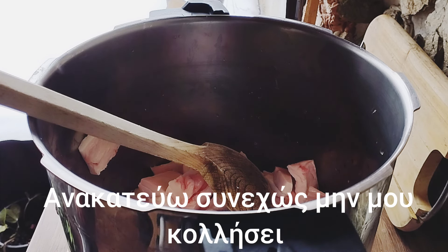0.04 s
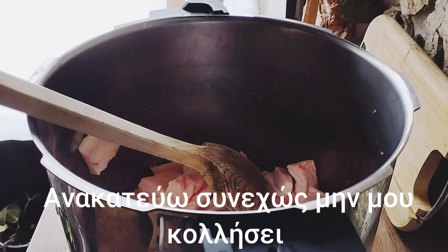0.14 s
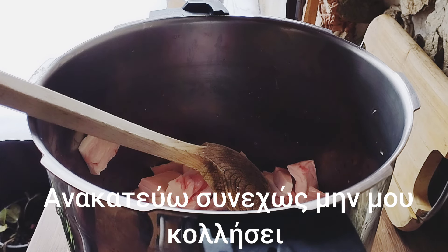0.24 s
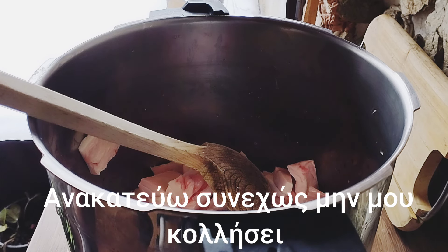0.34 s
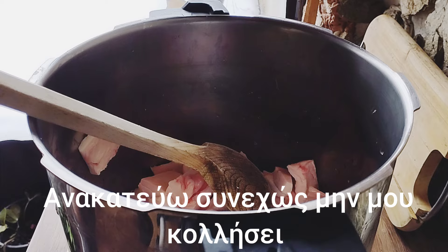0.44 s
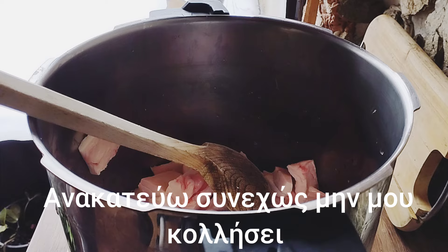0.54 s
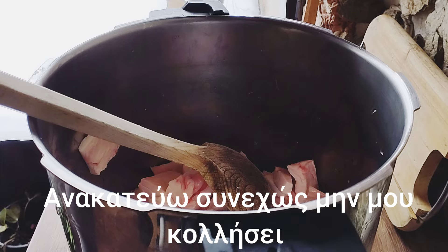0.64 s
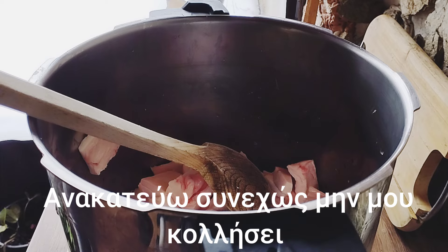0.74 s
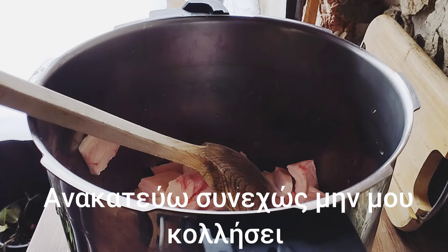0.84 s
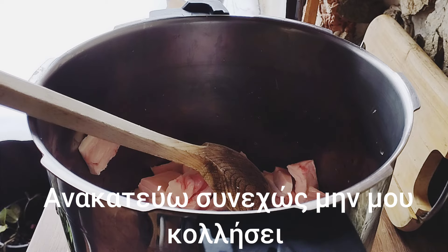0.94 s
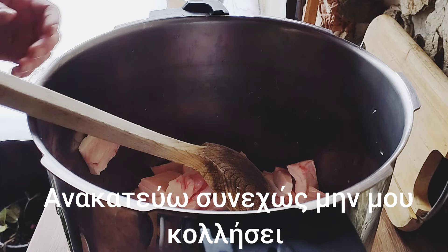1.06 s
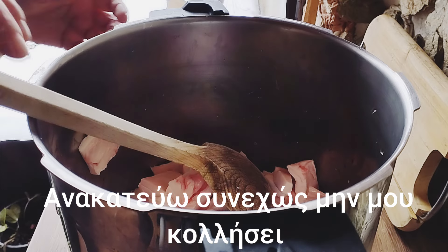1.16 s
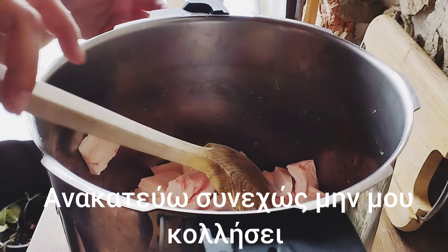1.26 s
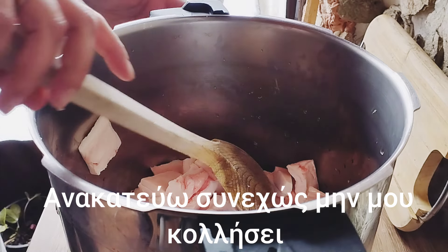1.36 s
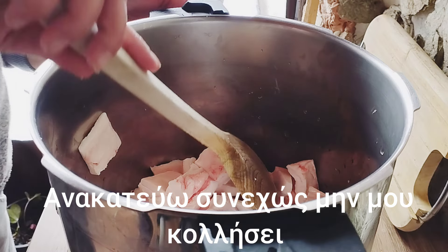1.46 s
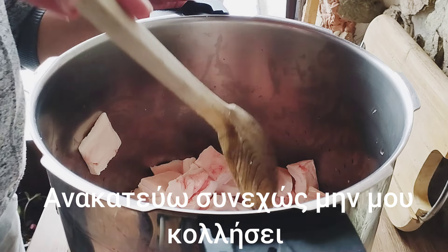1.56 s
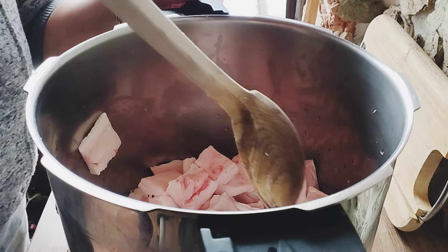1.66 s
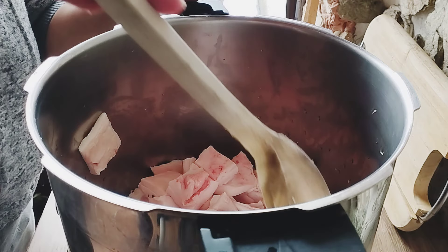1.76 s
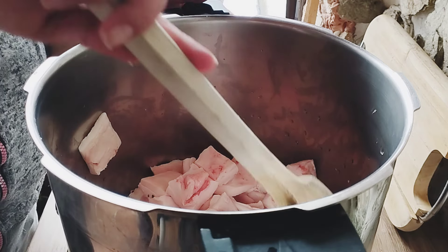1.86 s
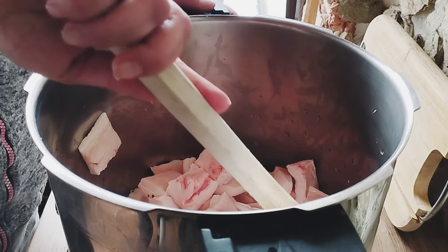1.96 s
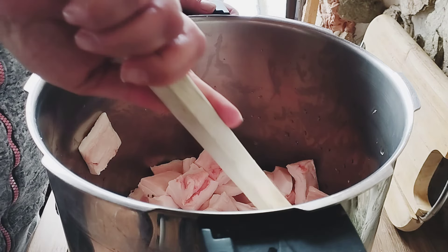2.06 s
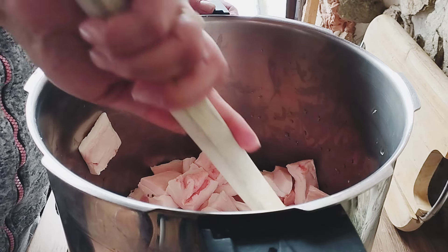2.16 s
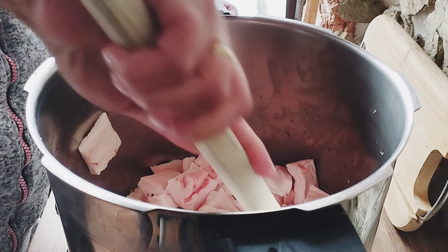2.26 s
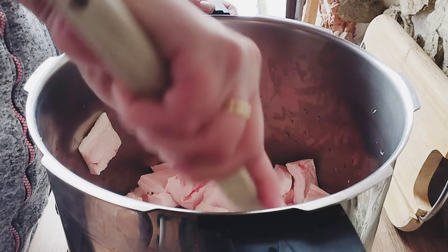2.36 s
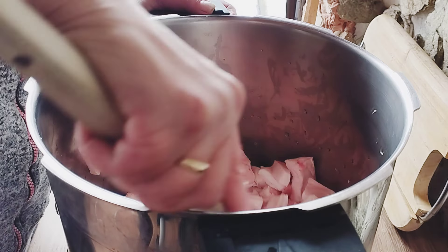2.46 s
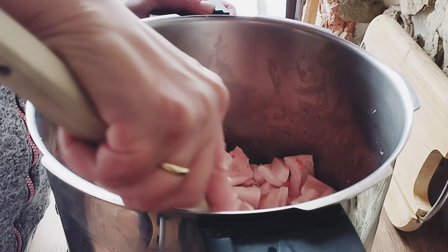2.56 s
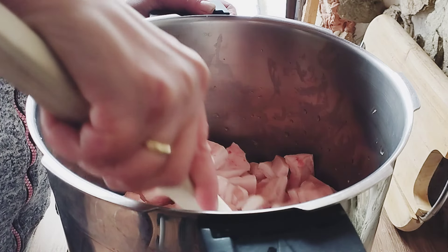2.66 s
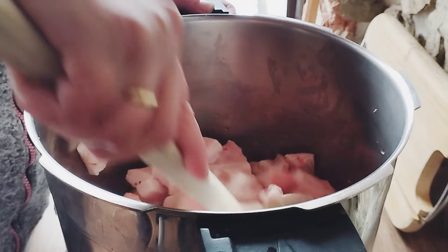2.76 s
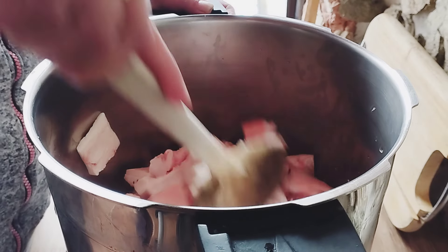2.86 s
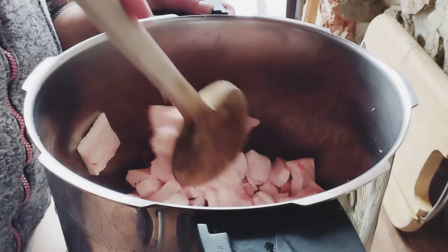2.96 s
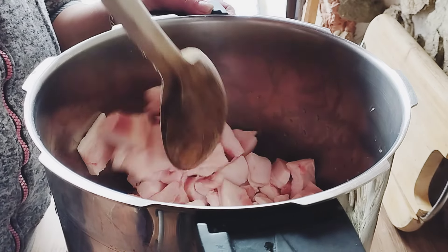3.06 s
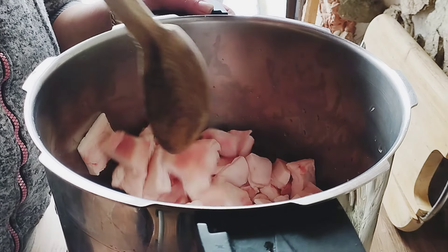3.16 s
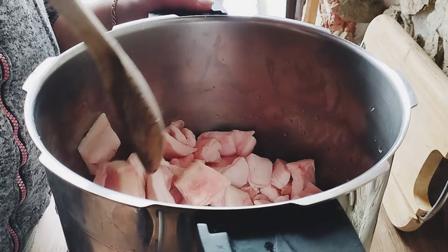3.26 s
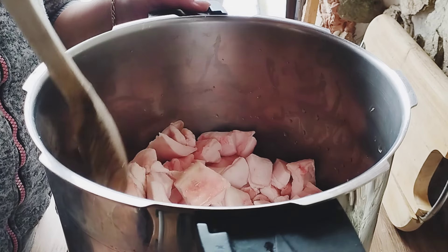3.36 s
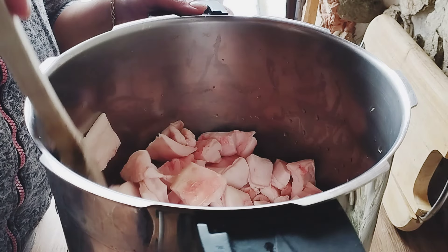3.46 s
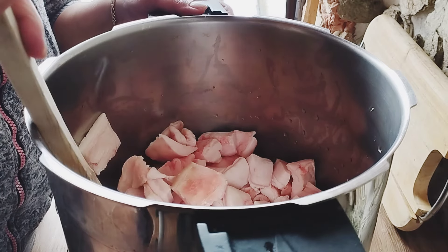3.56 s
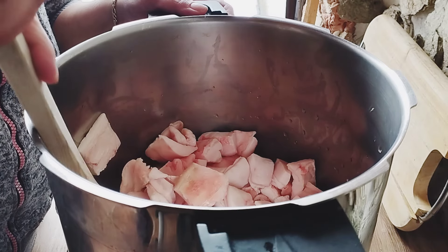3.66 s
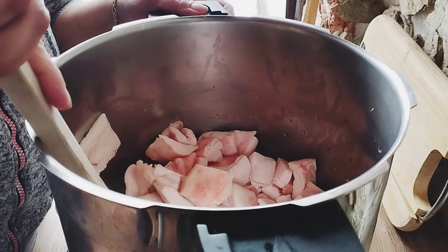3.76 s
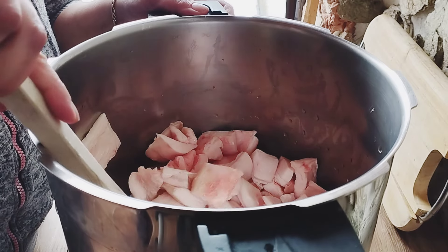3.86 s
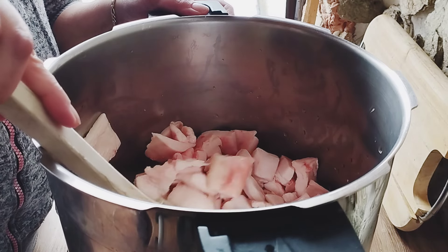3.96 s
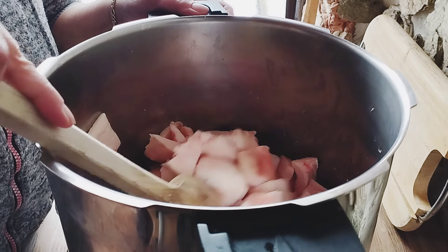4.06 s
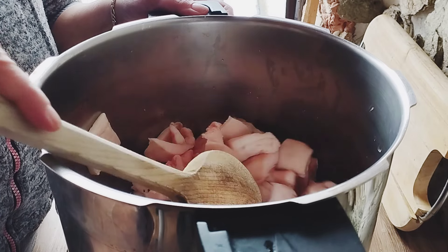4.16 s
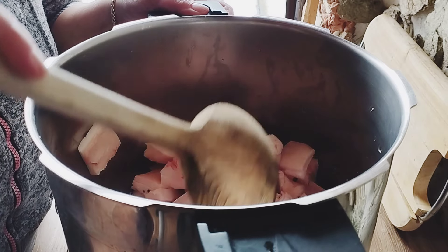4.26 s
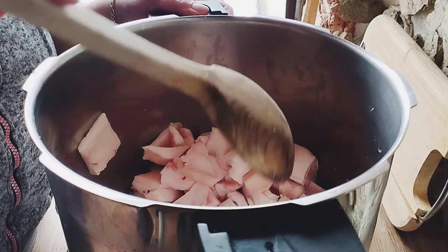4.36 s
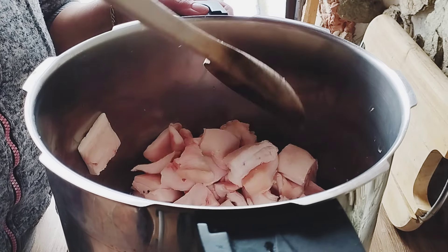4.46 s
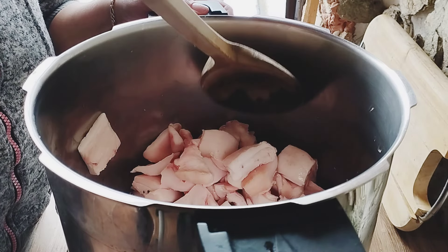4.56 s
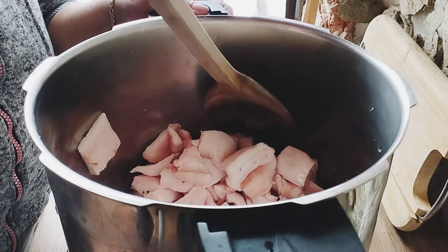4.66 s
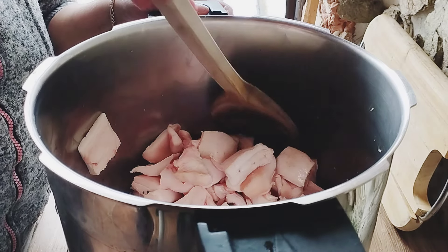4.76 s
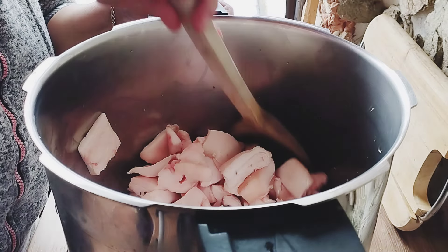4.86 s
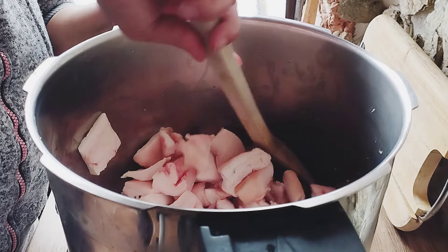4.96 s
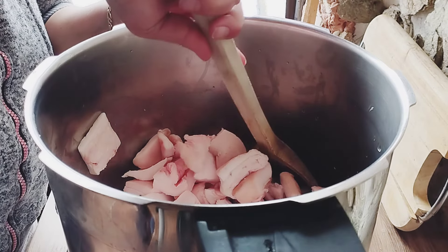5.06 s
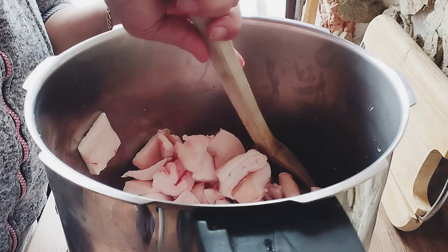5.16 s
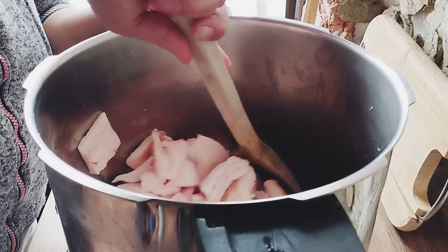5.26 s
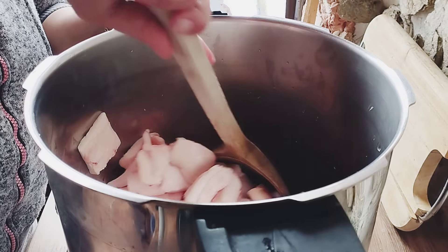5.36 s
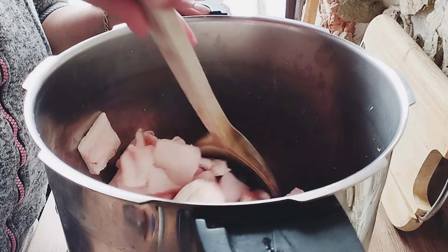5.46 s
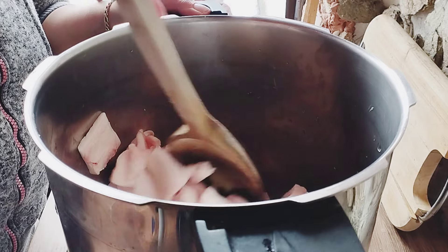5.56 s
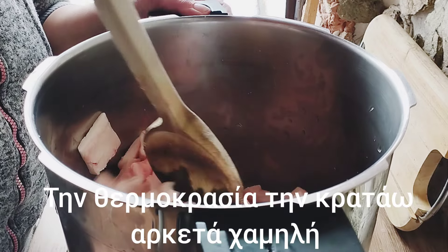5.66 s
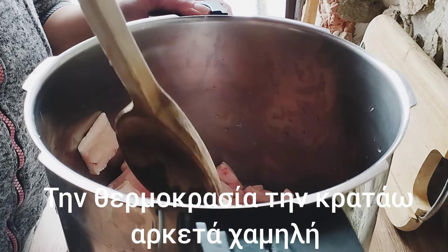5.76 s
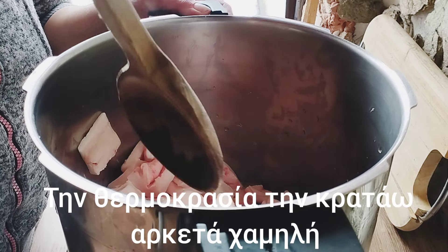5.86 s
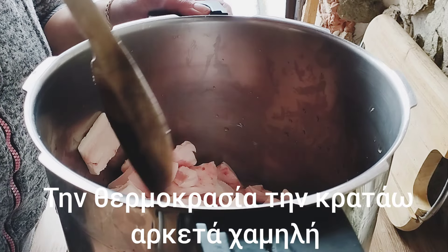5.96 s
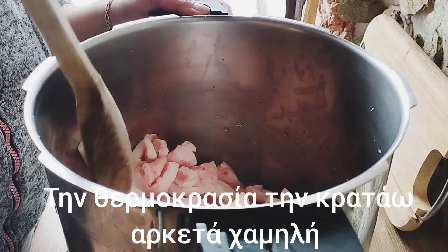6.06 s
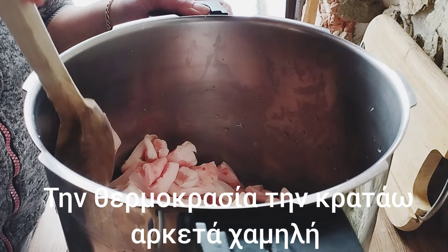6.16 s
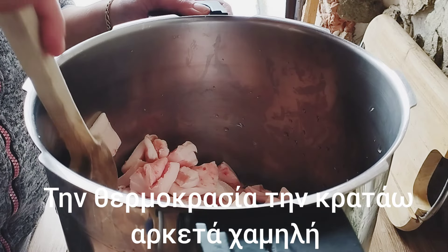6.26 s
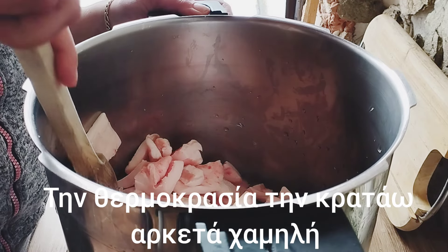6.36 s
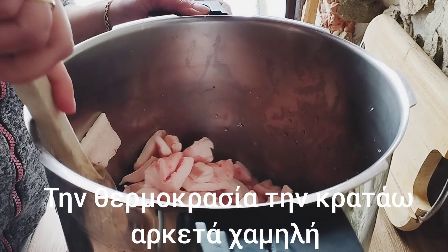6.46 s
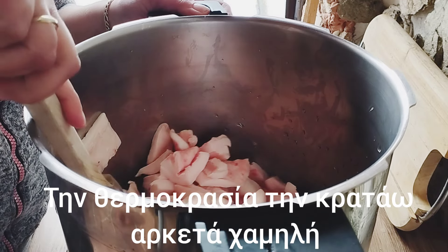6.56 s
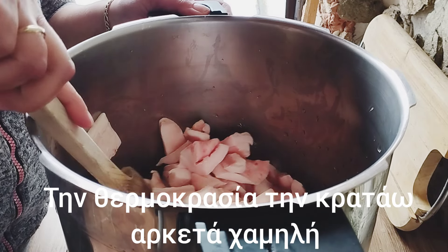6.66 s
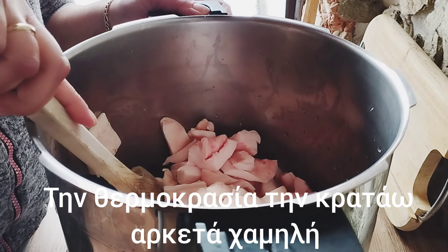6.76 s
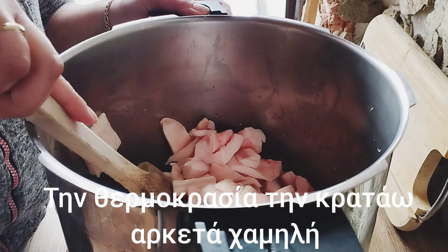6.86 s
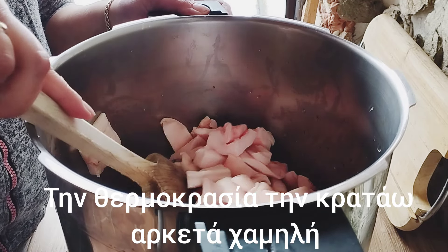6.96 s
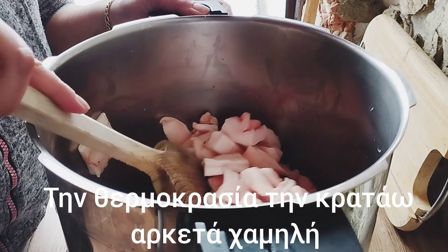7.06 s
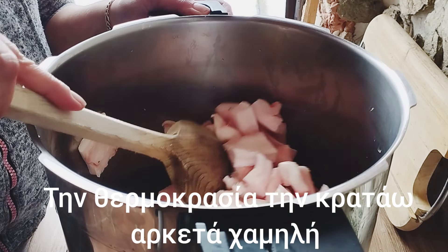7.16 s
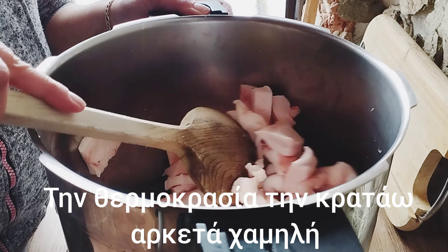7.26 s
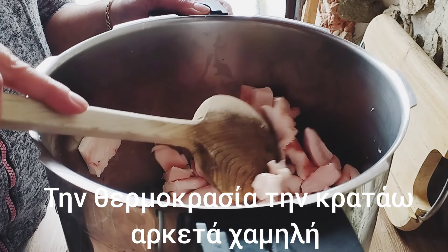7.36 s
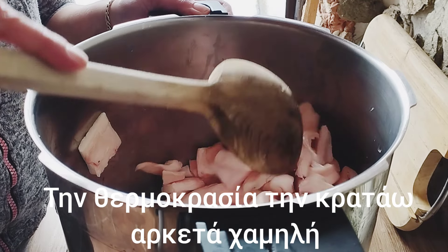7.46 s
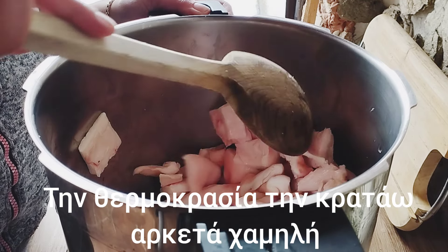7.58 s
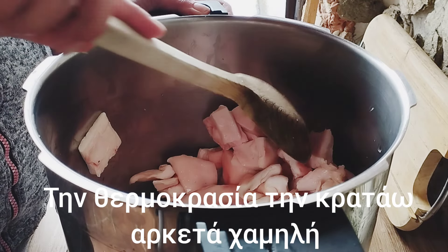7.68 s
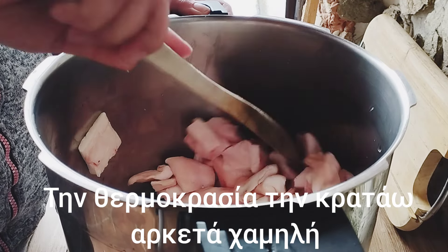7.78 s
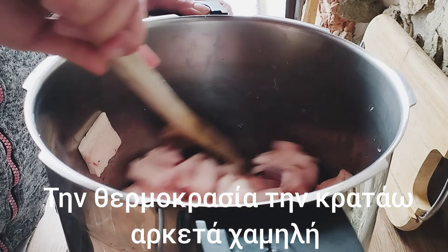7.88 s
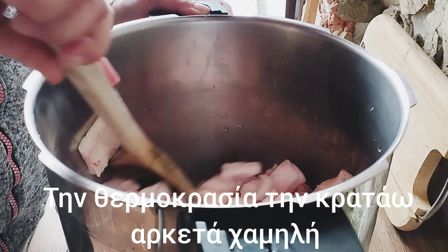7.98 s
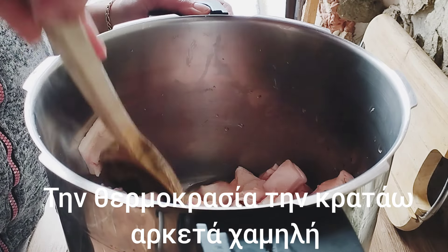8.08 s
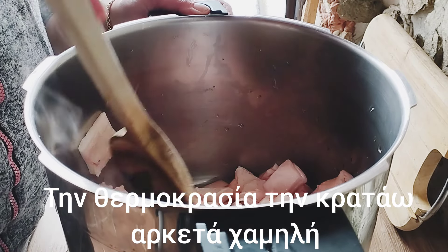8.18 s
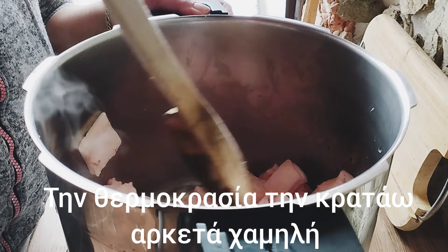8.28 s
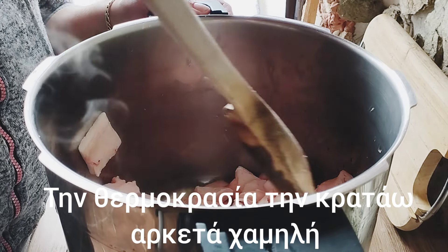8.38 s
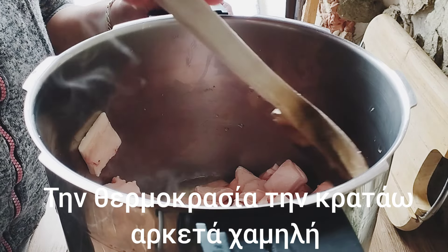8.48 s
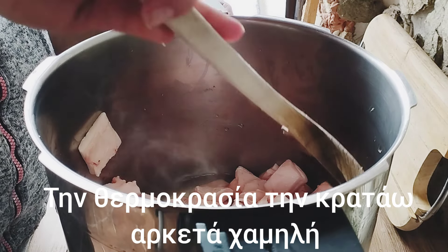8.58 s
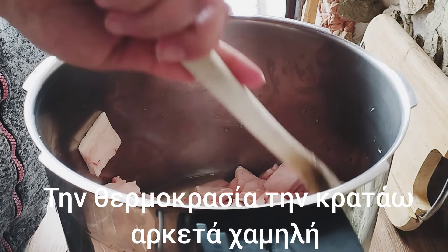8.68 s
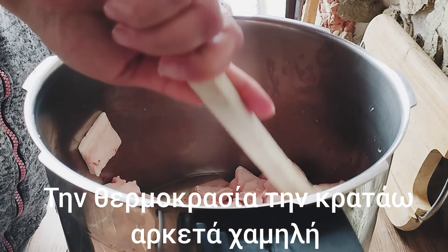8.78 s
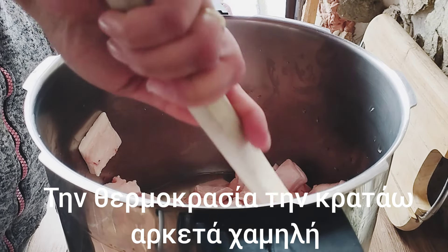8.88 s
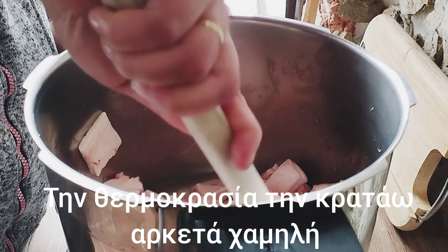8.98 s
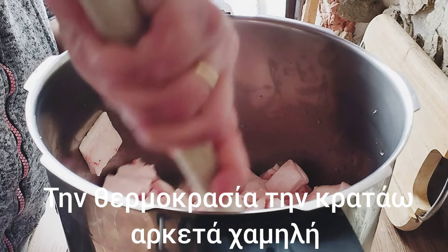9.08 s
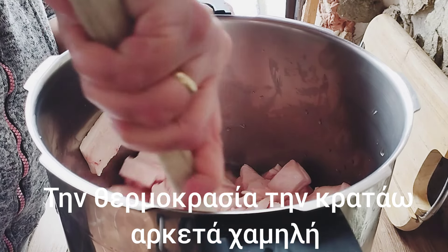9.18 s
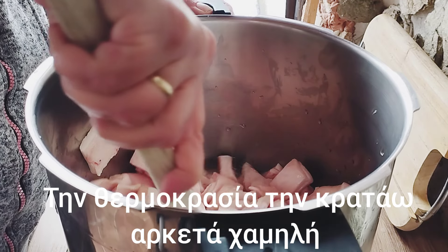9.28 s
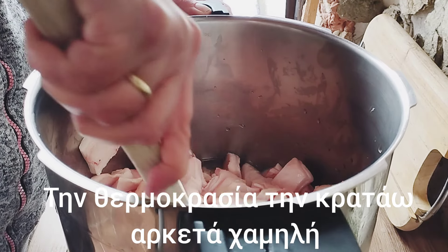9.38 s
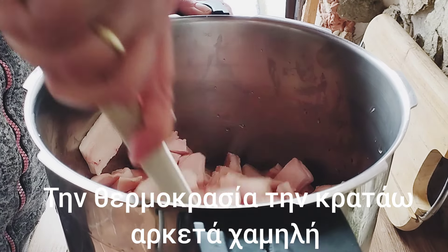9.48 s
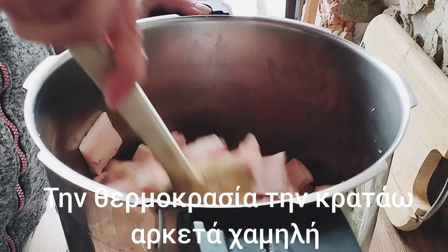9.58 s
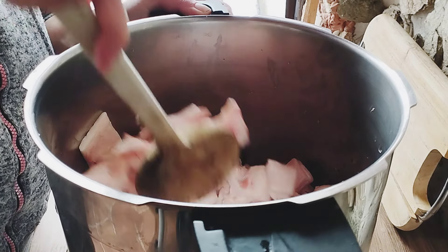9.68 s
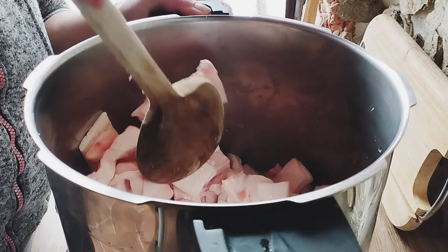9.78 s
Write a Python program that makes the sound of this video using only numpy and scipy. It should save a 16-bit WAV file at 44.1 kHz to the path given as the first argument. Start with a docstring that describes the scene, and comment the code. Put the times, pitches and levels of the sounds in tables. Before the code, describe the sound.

Fat crackles quietly in a steel pot, then a wooden spoon stirs with hollow knocks and small clacks above a low kitchen rumble.

```python
"""A small kitchen, two microphones a hand apart close to the stove, the left one first to hear the knocks.
From the start a low rumble, a wavering motor drone and a faint hiss (shaped noise and one low tone)
lie under crackling hot fat, made of short clicks heard largely through the room. From 1.9 s a wooden
spoon knocks a steel pot: decaying sines for air column and wall, a short wood tone, a noisy clack.
Hollow knocks stand out near 5 s; from 8 s knocks come thicker, with a strong crackle at 8.3 s."""
import sys
import numpy as np
from scipy import signal
from scipy.fft import rfft, irfft
from scipy.io import wavfile
from scipy.ndimage import uniform_filter1d

SR = 44100
rng = np.random.default_rng(int(sys.argv[2]) if len(sys.argv) > 2 else 0)


def log_audio(samples):
    """Write samples as a 16-bit WAV file to the path given in sys.argv[1]."""
    # one column per channel
    frames = np.atleast_2d(samples).T
    # limit to full scale, then quantise
    limited = np.clip(frames, -1, 1)
    pcm = np.round(limited * 32767).astype(np.int16)
    wavfile.write(sys.argv[1], SR, pcm)


N = 433503  # samples

# Spoon blows on the pot: start_s, air_column_db, wall_db, brightness_db_per_octave, spoon_pitch_hz,
# spoon_level_db, free_ringing_of_wall_db, choke_as_spoon_settles_db
BLOWS = [(1.889, -28, -35.5, -2.5, 875, -44, -1, 1.5), (2.44, -53, -63.5, -0.5, 800, -48, -14, 2.5),
         (2.932, -61, -62.5, -5, 1200, -44, -10, -8), (3.263, -53, -47.5, -1.5, 884, -41, -7, -12),
         (3.557, -53, -43, -10.5, 890, -43, -1, -3.5), (3.571, -56, -37, -8.5, 885, -15, -5, -7.5),
         (4.145, -73, -57, -1.5, 1076, -46, -23, -4), (4.628, -15.5, -26.5, -1, 3010, -17, -2.5, -9.5),
         (5.0193, -11, -38.5, 0.5, 1204, -17, -3.5, -14), (5.101, -87, -49.5, -2.5, 1243, -26.5, -14, -14),
         (5.752, -76, -58, -6, 1480, -30, -20, -12), (5.973, -40, -52.5, -7.5, 765, -58, -33, 0.5),
         (6.232, -28.5, -28.5, -5.5, 820, -19, -2.5, -5.5), (6.546, -39, -43, -4.5, 820, -35.5, -4.5, -4.5),
         (6.633, -24, -66, 0, 730, -39, -7, -9), (7.338, -72, -67, -11, 1340, -47, -4, -18),
         (7.952, -48, -58, -12, 645, -36.5, -14, -5.5), (7.989, -65, -53.5, -4, 1510, -64, -11, -18),
         (8.024, -49, -51, 3.5, 1830, -29, -5, -14), (8.04, -56, -47.5, -1.5, 2270, -29.5, -3.5, -12),
         (8.137, -75, -48, 2, 786, -50, -0.5, -21), (8.218, -79, -68, -4, 1070, -50, -5, -6),
         (8.558, -26.5, -45, -7, 744, -27, -1.5, -8.5), (8.77, -59, -66, -2.5, 1070, -53, -4, -9),
         (8.838, -64, -63, -0.5, 1040, -57, -11, -3), (8.907, -53, -68, -11, 554, -48, -20, 2),
         (8.99, -52, -61, -8.5, 507, -52, -7, 2.5), (9.158, -76, -39, -5, 1612, -22, -3, -1),
         (9.194, -16, -48, -1.5, 1770, -33, -19, -11), (9.445, -63, -45.5, -5.5, 2070, -34, -6.5, -4.5)]
# Where a blow's force is set, thud and air column first, then the wall: pitch_hz
BLOW_BANDS = (145, 340, 850, 1600, 2500, 4500)
# Thud through the stove and air column of the pot: pitch_hz, level_db, t60_s
AIR_MODES = [(121.8, -0.5, 0.46), (175.5, 4.5, 0.35), (243.5, 1.5, 0.32), (323.5, 1, .2), (346, -6.5, 0.1),
             (427.7, -11.5, 0.22)]
# Ringing wall of the pot: pitch_hz, level_db, t60_s
WALL_MODES = [(549, -6, 0.18), (725, -17.5, 0.22), (735.4, -7, 0.1), (839, -0.5, 0.19), (857, -5, 0.22),
              (897, -13, 0.2), (1070, -24, 0.053), (1313, -7.5, 0.1), (1336, -2.5, 0.14), (1634, 3, 0.22),
              (1729, 3.5, 0.054), (1845, -6, 0.12), (1998, 1, 0.059), (2237, 0, 0.14), (2360, -6.5, 0.12),
              (2535, -1, 0.15), (2956, 7.5, 0.041), (3630, 2, 0.042), (4500, -18, 0.11)]
# Single bursts in the fat: start_s, snap_db, fizz_db, side (1 right, -1 left)
BURSTS = [(0.7323, -52.5, -48.5, 1), (0.8768, -44.5, -60, 1), (0.928, -51, -56, 1), (1.009, -49, -56, 1),
          (1.3558, -70, -50, 1), (1.394, -44, -52.5, 1), (1.931, -43, -50, 1), (2.2694, -62, -49.5, -1),
          (2.5373, -55.5, -70, -1), (2.7505, -48, -59, -1), (2.879, -60, -92, 1), (3.073, -59.5, -55, 1),
          (3.1078, -49, -37, -1), (3.86, -58, -61, -1), (3.96, -60, -70, 1), (4.1266, -52.5, -53, 1),
          (4.1926, -66, -55, 1), (4.311, -61.5, -52, 1), (4.87, -44.5, -48.5, 1), (5.001, -70, -49, 1),
          (5.0585, -48, -39.5, 1), (5.429, -74, -55, 1), (5.5728, -54.5, -48.5, 1), (5.7352, -47, -41.5, 1),
          (5.8785, -108, -52, -1), (6.1555, -60, -60, 1), (6.872, -39, -51, 1), (7.0433, -52, -54, 1),
          (7.08, -50, -65, 1), (7.1342, -48, -52, 1), (7.369, -45, -45, 1), (7.678, -43, -43, 1),
          (7.848, -45, -66, 1), (7.953, -55.5, -51, 1), (8.1, -52, -50, 1), (8.204, -56, -57, 1),
          (8.22, -73, -57, 1), (8.31, -34, -32, 1), (8.6796, -61.5, -53, 1), (9.53, -50, -74, 1),
          (9.5381, -41, -45.5, 1)]
# Body, snap and fizz of a burst: pitch_hz
BURST_BANDS = (900, 4000, 13000)
# Reflections off near walls and worktop: delay_left_ms, delay_right_ms, gain (relative)
NEAR_WALLS = [(1.4, 1.044, -0.094), (3.7, 4.7, -0.48), (4.6, 4, 0.9), (6.5, 14, 0.99)]
# Dying away of the room's tail: pitch_hz, t60_s
TAIL_DECAY = [(250, 0.28), (660, 0.38), (1740, 0.37), (4590, 0.35), (12100, 0.27)]
# Colour of the room's tail: pitch_hz, level_db (relative)
TAIL_COLOUR = [(200, -26.5), (450, 5), (900, -2.5), (3000, -3.5), (12000, -4)]
# Likeness of left and right, for tail and background: pitch_hz, likeness (0 to 1)
LIKENESS = [(60, 0.72), (180, 1), (550, 0.57), (1650, 0.016), (4970, 0.037), (15000, 0.0089)]
# Colour of the background noise: pitch_hz, level_db (per Hz, relative)
NOISE_COLOUR = [(20, -1.5), (90, -12), (250, -16), (400, -25.5), (700, -35.5), (1300, -38.5), (2000, -42),
                (4500, -42.5), (7000, -43.5), (16000, -44)]
# Faint appliance hums, as humps in that noise: pitch_hz, width_hz, rise_db
HUM_HUMPS = [(145.5, 25.5, 8), (311, 9.9, 11.5), (3465, 380, 6), (5700, 600, 5.5)]
# Background over time: start_s, drone_db, rubbing_db, sizzle_db
BACKGROUND_LEVELS = [(0.0, -58, -68.5, -68), (2.11, -58.5, -64, -64.5), (2.76, -58, -69, -68.5),
                     (3.26, -59, -64, -63.5), (3.48, -66, -64, -68.5), (3.83, -54.5, -64, -65),
                     (4.52, -53.5, -67.5, -67.5), (4.76, -51.5, -58, -69), (4.95, -54.5, -62.5, -61.5),
                     (5.2, -49, -64, -66), (5.56, -59, -68, -64.5), (6.57, -48.5, -65.5, -66.5),
                     (7.01, -59, -61.5, -65), (7.69, -57, -65, -67), (8.16, -64, -63, -60),
                     (8.46, -60, -66, -66), (9.17, -48.5, -60, -61.5), (9.83, -61, -64.5, -68)]
# Difference between the two microphones: pitch_hz, left_over_right_db
LEFT_OVER_RIGHT = [(60, 0.5), (180, 2), (550, 0), (1650, 0.0), (4970, -3), (15000, 5.5)]
# Colour common to both microphones: pitch_hz, level_db
MIC_COLOUR = [(6500, 0.5), (8300, -5), (9500, -3.5), (11000, -7), (13000, 3), (15000, 3)]

THUD_DB = -15.5  # thud against the spoon tone
NEAR_DB, NEAR_OCTAVES = 4.5, 0.44  # the wall rings more near the spoon tone
WOOD_ECHO_DB = -7.5  # the wood fills the room less
BODY_DB, LAG_MS, ECHO_DB = -9.5, 0.16, 7.5  # body against snap; left's lag; echo against direct sound
RUMBLE_DB, EDGE_HZ = -50.5, 15900  # steady rumble; upper band limit


def amp(db):
    """Turn dB into a gain."""
    return 10 ** (np.asarray(db) / 20)


def evened(x):
    """Scale to an RMS of one."""
    return x / np.sqrt(np.mean(x ** 2) + 1e-20)


def read(points, hz):
    """Read a curve between its points, along log frequency."""
    f, value = np.transpose(points)
    return np.interp(np.log(hz + 1), np.log(f + 1), value)


def add(mix, start_s, sound):
    """Lay a sound into one channel, cut at the end."""
    part = mix[round(start_s * SR):][:len(sound)]
    part += sound[:len(part)]


def click(colour_db, size=512):
    """The shortest causal (minimum-phase) pulse with the given dB at each FFT frequency."""
    log_gain = np.log(amp(np.r_[colour_db, colour_db[-2:0:-1]]))
    return np.fft.ifft(np.exp(np.conj(signal.hilbert(log_gain)))).real[:size]


def blow_force(air_db, wall_db, slope_db, wood_db):
    """Force over frequency: thud, air column, then a wall slope that tilts about its second band."""
    octaves = np.log2(np.array(BLOW_BANDS[2:]) / BLOW_BANDS[3])
    force_db = [wood_db + THUD_DB, air_db, *(wall_db + slope_db * octaves)]
    top = [(6800, force_db[-1] - 7.5), (10000, force_db[-1] - 19.5)]
    return list(zip(BLOW_BANDS, force_db)) + top


def near_spoon(hz, wood_hz):
    """Extra dB for the wall where its pitch lies near the spoon tone."""
    return NEAR_DB / (1 + (np.log2((hz + 1) / wood_hz) / NEAR_OCTAVES) ** 2)


def wall_clack(noise, force, wood_hz, t, level_db=3, t60_s=0.12):
    """The many wall modes damped by spoon and fat merge into a short burst of shaped noise."""
    hz = np.fft.rfftfreq(len(t), 1 / SR)
    wall = [(300, force[2][1] - 12)] + force[2:]
    per_hz = np.sqrt(SR / (hz + 100) / 2)  # the force is given for each octave
    colour = amp(read(wall, hz) + near_spoon(hz, wood_hz)) * per_hz
    return irfft(rfft(noise) * colour, len(t)) * amp(level_db - 60 * t / t60_s)


def spoon_contact(t, choke_db, rise_ms=0.9, settle_ms=10.0):
    """The contact sets in softly, then the sound moves by choke_db as the spoon settles."""
    ms = t * 1000
    return (1 - np.exp(-ms / rise_ms)) * amp(choke_db / (1 + np.exp(settle_ms - ms)))


def knocks(lag_ms=-0.18, spot_db=2.0, spread_rad=1.47, rise_turns=0.68, wood_t60_s=0.035):
    """Blows share force among pot modes by landing spot, plus wood and clack; gives direct, sent to room."""
    out = np.zeros((2, 2, N))  # path (direct, sent to the room), microphone, sample
    t = np.arange(SR // 3) / SR
    hz, mode_db, t60_s = np.transpose(AIR_MODES + WALL_MODES)[:, :, None]
    in_wall = hz > 500
    build_up = 1 - np.exp(-t * hz / rise_turns)  # low modes take longer to build up
    opposed = np.pi * np.arange(len(hz))[:, None] * in_wall  # neighbours start opposed
    turn = 2 * np.pi * hz * t + opposed
    chance = rng.standard_normal((len(BLOWS), 2, len(hz), 1))
    noises = rng.standard_normal((len(BLOWS), len(t)))
    for blow, (spot, facing), noise in zip(BLOWS, chance, noises):
        start_s, air_db, wall_db, slope_db, wood_hz, wood_db, free_db, choke_db = blow
        force = blow_force(air_db, wall_db, slope_db, wood_db)
        ring_db = in_wall * (spot_db * spot + free_db + near_spoon(hz, wood_hz))
        decay = build_up * amp(read(force, hz) + mode_db + ring_db - 60 * t / t60_s)
        wood = amp(wood_db - 60 * t / wood_t60_s) * np.sin(2 * np.pi * wood_hz * t)
        clack = wall_clack(noise, force, wood_hz, t)
        contact = spoon_contact(t, choke_db)
        # each microphone faces another part of the wall
        left_shift = spread_rad * facing * in_wall
        for mic, lag_s, shift in ((0, lag_ms / 1000, left_shift), (1, 0, 0)):
            steel = (decay * np.sin(turn + shift)).sum(0) + clack
            add(out[0, mic], start_s + lag_s, contact * (steel + wood))
            add(out[1, mic], start_s + lag_s, contact * (steel + wood * amp(WOOD_ECHO_DB)))
    return out


def burst_click(snap_db, fizz_db, hz, gap_db=-0.5, top_db=-5, gain_db=24.0):
    """One water pocket bursting: a sharp click coloured by body, snap and fizz."""
    body_db = snap_db + BODY_DB
    width_db = 10 * np.log10(np.array(BURST_BANDS) / 4000)  # wider bands hold less per Hz
    body, snap, fizz = zip(BURST_BANDS, np.array([body_db, snap_db, fizz_db]) - width_db)
    gap = (8500, (snap[1] + fizz[1]) / 2 + gap_db)
    colour = [(200, body_db + 10), body, snap, gap, fizz, (16000, fizz[1] + top_db)]
    return click(read(colour, hz) + gain_db)


def small_crackles(hz, per_s=21.0, least_db=-53.5, spread_db=5.5):
    """Many small bursts at chance moments, alike in both microphones."""
    draw, size = rng.random(N), rng.exponential(1, N)
    bursts = (draw < per_s / SR) * amp(least_db + spread_db * np.minimum(size, 2))
    colour = [(300, -25), (1500, 0), (5000, 1.0), (14000, -1)]  # pitch_hz, level_db
    return signal.oaconvolve(bursts, click(read(colour, hz)))[:N]


def crackles(small_echo_db=8.5):
    """Water pockets burst in the fat, as single and small clicks; gives direct, sent to room."""
    out, hz = np.zeros((2, 2, N)), np.fft.rfftfreq(1024, 1 / SR)
    for start_s, snap_db, fizz_db, side in BURSTS:
        pop = burst_click(snap_db, fizz_db, hz)
        left_s = start_s + np.sign(side) * LAG_MS / 1000  # left hears a burst on the right later
        for path, gain in zip(out, (1, amp(ECHO_DB))):
            add(path[0], left_s, gain * pop)
            add(path[1], start_s, gain * pop)
    return out + small_crackles(hz) * amp([0, small_echo_db])[:, None, None]


def kitchen(direct, sent, early_db=-18.0, count=3):
    """A few near reflections, then the tail, blended slowly from several random echo patterns."""
    early = np.zeros((2, SR // 50))
    for left_ms, right_ms, gain in NEAR_WALLS:
        at = [round(left_ms * SR / 1000), round(right_ms * SR / 1000)]
        early[[0, 1], at] += gain * amp(early_db)
    out = direct + signal.oaconvolve(sent, early, axes=1)[:, :N]
    turn = np.pi * np.arange(N) / SR / 2
    for k in range(count):
        share = np.sqrt(2 / count) * np.cos(turn + np.pi * k / count)  # squares sum to one
        out += signal.oaconvolve(sent * share, echo_tail(), axes=1)[:, :N]
    return out


def echo_tail(start_ms=1.0, crowd_db=8.0, crowd_ms=10.0):
    """Sparse random taps, each band dying at its own speed; long waves reach both microphones more alike."""
    size, step = SR // 2, 12
    taps = np.zeros((2, size))
    at = np.arange(0, size - step, step) + rng.integers(0, step, (2, (size - 1) // step))
    np.put_along_axis(taps, at, rng.choice([-1., 1.], at.shape), 1)
    hz, t, z = signal.stft(taps, SR, nperseg=512)
    same = np.clip(read(LIKENESS, hz), -1, 1)[:, None]
    z = np.array([z[0], same * z[0] + np.sqrt(1 - same ** 2) * z[1]])
    z *= amp(read(TAIL_COLOUR, hz)[:, None] - 60 * t / read(TAIL_DECAY, hz)[:, None])
    tail = signal.istft(z, SR, nperseg=512)[1][:, :size]
    ms = np.arange(size) / SR * 1000
    fade_in = np.clip(ms / start_ms - 1, 0, 1)
    tail *= fade_in * amp(crowd_db * np.exp(-ms / crowd_ms))  # echoes are stronger at first
    return tail / np.linalg.norm(tail[0])


def room_noise(hz, frames, patchy_db=1.0):
    """Spectrogram of coloured noise with hum humps and slow patches, partly shared by the microphones."""
    a, b, c, d, patches = rng.standard_normal((frames, len(hz), 5)).T
    patches = uniform_filter1d(patches, size=16, axis=0)
    patches = evened(uniform_filter1d(patches, size=6, axis=1))
    same, left = np.clip(read(LIKENESS, hz), -1, 1)[:, None], a + 1j * b
    right = same * left + np.sqrt(1 - same ** 2) * (c + 1j * d)
    humps = sum(db / (1 + (2 * (hz - f) / width) ** 2) for f, width, db in HUM_HUMPS)
    colour_db = read(NOISE_COLOUR, hz) + humps
    return np.array([left, right]) * amp(colour_db[:, None] + patchy_db * patches)


def background(low_hz=444.0, high_hz=1630.0, grain_db=2.5):
    """Rumble from outside and the drone; above them soft rubbing of spoon and fat, then sizzle and hiss."""
    hz = np.fft.rfftfreq(2048, 1 / SR)
    z = room_noise(hz, frames=N // 512 + 5)
    low, under_high = (1 / (1 + (hz[:, None] / edge) ** 4) for edge in (low_hz, high_hz))
    bands = []
    for share in (low, under_high - low, 1 - under_high):
        band = signal.istft(z * np.sqrt(abs(share)), nperseg=2048, noverlap=1536)[1]
        bands.append(evened(band[:, :N]))
    rumble, rub, sizzle = bands
    grain = evened(uniform_filter1d(rng.standard_normal(N), size=400))
    rub *= evened(amp(grain_db * grain))  # wet pieces slip in lumps
    start_s, *levels = np.transpose(BACKGROUND_LEVELS)
    t = np.arange(N) / SR
    drone_gain, rub_gain, sizzle_gain = (amp(np.interp(t, start_s, db)) for db in levels)
    return rumble * amp(RUMBLE_DB) + drone() * drone_gain + rub * rub_gain + sizzle * sizzle_gain


def drone(hz=53.6, wander_hz=3.41, swell_db=1.5):
    """A distant motor: one low sine that wavers in pitch and level."""
    slow = [uniform_filter1d(uniform_filter1d(noise, size=6000), size=6000)
            for noise in rng.standard_normal((2, N))]
    wander, swell = map(evened, slow)
    phase = 2 * np.pi * np.cumsum(hz + wander_hz * wander) / SR
    return np.sqrt(2) * amp(swell_db * swell) * np.sin(phase)


def scene(knock_echo_db=-6.0):
    """Knocks close by and crackles heard largely through the room, over the background."""
    blows, blows_sent = knocks()
    pops, pops_sent = crackles()
    return kitchen(blows + pops, blows_sent * amp(knock_echo_db) + pops_sent) + background()


def record(dry):
    """The two microphones' colours, then the upper band limit."""
    hz = np.fft.rfftfreq(N, 1 / SR)
    halves = np.array([[.5], [-.5]])  # left and right split the difference
    colour = amp(halves * read(LEFT_OVER_RIGHT, hz) + read(MIC_COLOUR, hz))
    heard = irfft(rfft(dry) * colour, N)
    low_pass = signal.firwin(511, EDGE_HZ, window=("kaiser", 9), fs=SR)
    return signal.oaconvolve(heard, low_pass[None], "same")


dry = scene()
out = record(dry)
log_audio(out)
```